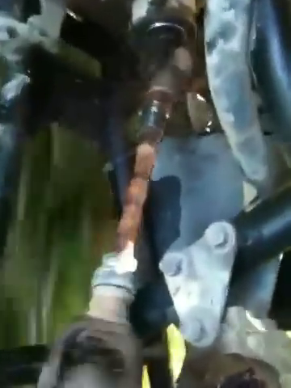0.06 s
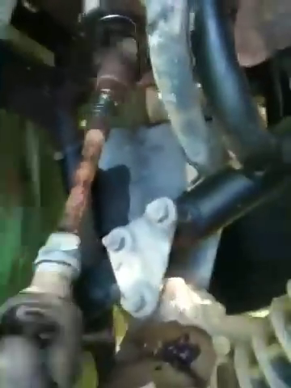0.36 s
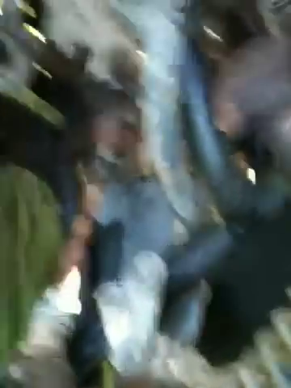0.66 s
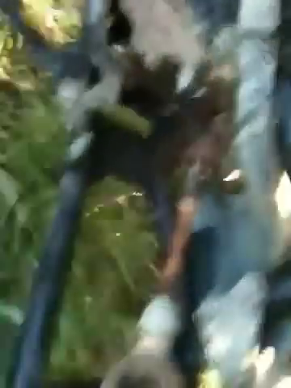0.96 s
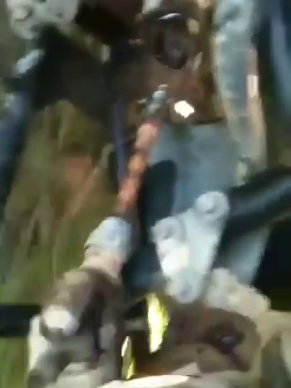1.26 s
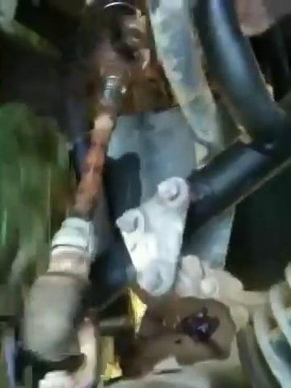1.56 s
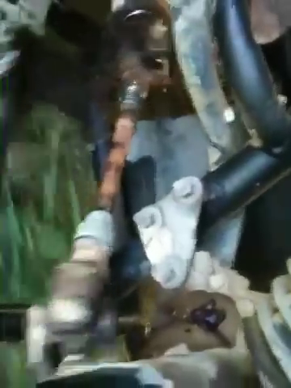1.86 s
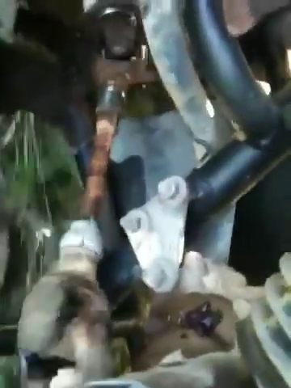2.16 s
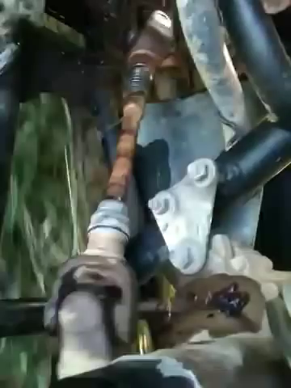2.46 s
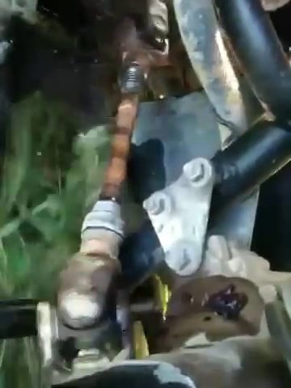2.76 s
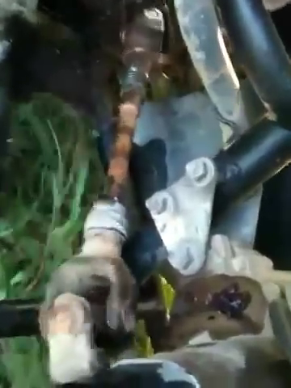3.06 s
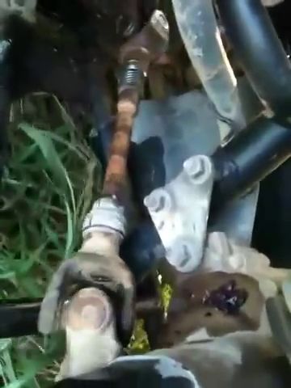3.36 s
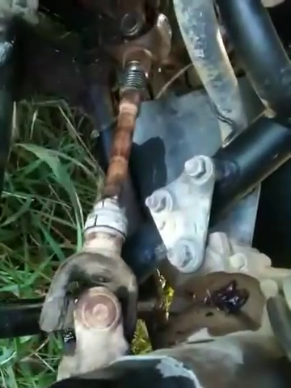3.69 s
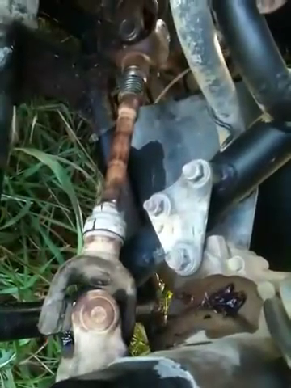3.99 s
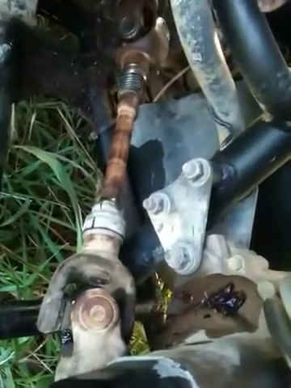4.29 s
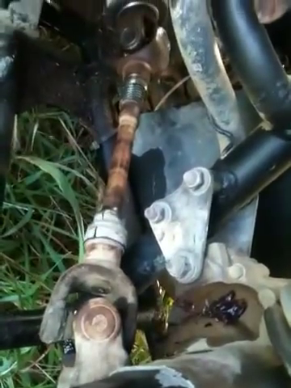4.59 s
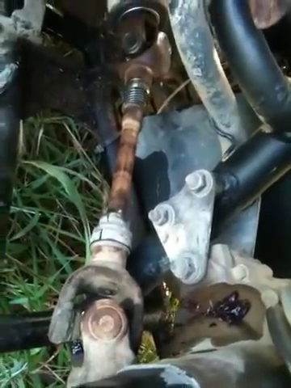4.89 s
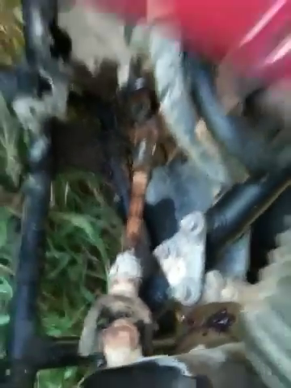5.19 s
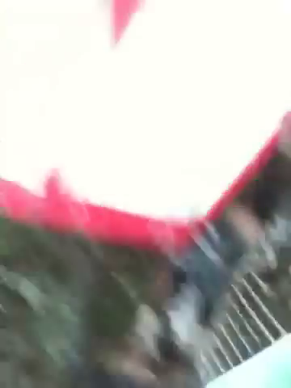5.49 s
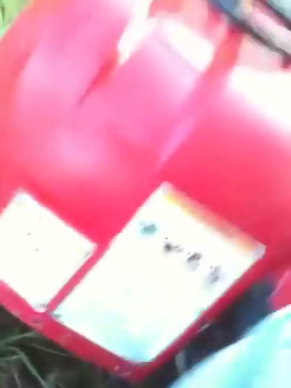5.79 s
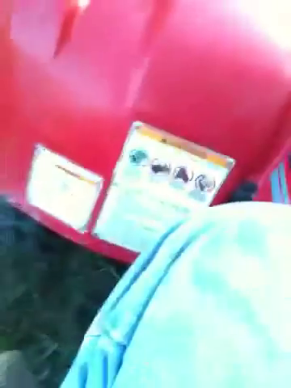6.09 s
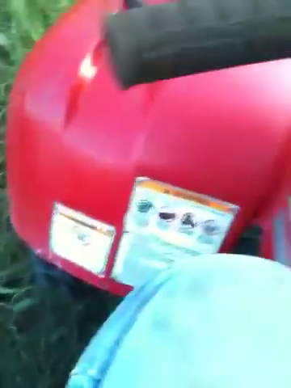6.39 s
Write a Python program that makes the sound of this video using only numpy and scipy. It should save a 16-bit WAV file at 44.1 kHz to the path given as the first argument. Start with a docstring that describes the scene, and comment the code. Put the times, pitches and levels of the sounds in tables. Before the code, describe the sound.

Close to the drive shaft of an all-terrain vehicle rolling over grass, loose metal joints knock and clank in a rapid, irregular clatter, with a brief squeal early on. Tyres rumble and swish underneath. The knocks thin out and stop a little past halfway as the vehicle comes to rest. Grass stems rustle in the quiet open air, then clothing brushes the bodywork and a plastic panel creaks.

```python
"""On grass in the open air, close to the front drive shaft of an all-terrain vehicle.
Slack in the spinning joints knocks and rebounds, ringing the housing; a dry joint sticks and squeals.
Tyres rumble and swish over the turf, and the knocks thin out as the vehicle comes to rest.
Stems rustle and a far insect trills through the lull, then clothing brushes the bodywork
and a panel creaks in a run of slow slips."""
import sys
import numpy as np
from scipy import signal
from scipy.fft import rfft, irfft
from scipy.io import wavfile

SR = 44100
rng = np.random.default_rng(int(sys.argv[2]) if len(sys.argv) > 2 else 0)


def store_pcm(level_fs):
    """Save levels as 16-bit WAV."""
    pcm = np.round(np.clip(level_fs, -1, 1) * 32767).astype(np.int16)
    wavfile.write(sys.argv[1], SR, np.atleast_2d(pcm).T)


N = 283983
TIME_S = np.arange(N) / SR

# Levels are relative within a source. T60 is the time to fall 60 dB.
# Noise spectra. Each row: frequency in Hz, density in dB.
AIR_SPECTRUM = [(24, -54.5), (40, -29), (79, -38.5), (128, -2.5), (224, -3.5), (254, -5.5), (371, -9.5),
                (857, -9.5), (1080, -10), (1220, -11), (2240, -15.5), (5870, -14.5), (6800, -8.5),
                (7560, -15.5), (9030, -18), (17000, -27)]
CLOTH_SPECTRUM = [(50, -52), (100, -21), (180, 0.5), (400, -4), (1000, -8.5), (2200, -12.5), (3400, -9.5),
                  (4600, -9), (6900, -6.5), (8000, -0.5), (9200, -1), (10600, -6.5), (12200, -3.5),
                  (14500, -11.5), (17000, -15.5)]
STEM_SPECTRUM = [(120, -36), (400, -5), (1100, -1.5), (2050, -13), (2450, -5.5), (2800, 3), (3300, -1),
                 (4000, 0), (6800, 1), (11000, -4.5), (17000, -21)]
SCRAPE_SPECTRUM = [(60, -25), (150, -7), (350, 1.5), (600, -3), (1100, -1), (1600, -6.5), (3000, -16),
                   (6000, -31)]
CRUNCH_SPECTRUM = [(150, -36), (450, 2), (1100, 5), (1900, -3.5), (3300, -10.5), (7000, -19)]
RUMBLE_SPECTRUM = [(30, -58), (70, -29.5), (110, -11.5), (170, -3), (280, -1), (480, -3.5), (750, -6.5),
                   (1200, -5.5), (1700, -15.5), (3000, -15.5), (6000, -52)]
SWISH_SPECTRUM = [(900, -22), (1900, 0), (2700, -0.5), (3400, 5), (4000, 2), (5200, 5.5), (7000, 5),
                  (9000, -8.5), (12000, -22.5), (17000, -34.5)]
FIZZ_SPECTRUM = [(5000, -22.5), (8000, 3.5), (10500, 2), (13000, -1.5), (17000, -7.5)]
BODYWORK_SPECTRUM = [(120, -15), (300, -1), (700, -1), (1500, -5.5), (2200, -11), (3500, -14), (8000, -22)]
FRAME_RATTLE_SPECTRUM = [(60, -26.5), (150, -0.5), (300, 12), (600, 17), (900, 5), (1300, 5), (1900, 8.5),
                         (3300, 2), (6000, -4), (10000, 4.5), (17000, -20)]
CRASH_SPECTRUM = [(60, -14.5), (300, 16.5), (900, 16), (1700, 14.5), (3300, 16.5), (8000, 14),
                  (17000, -3.5)]

# Resonances of the vehicle's parts. Each row: frequency in Hz, bandwidth in Hz, level in dB.
THIN_METAL_MODES = [(2613, 32, 1), (2850, 12, 2), (3320, 17.4, -4), (3500, 9.9, -1), (4080, 25, -1),
                    (5260, 27, -3), (7670, 41, -8), (7800, 37, 2)]
CHASSIS_MODES = [(215, 26, -1.5), (266, 16, -1.5), (311, 24, -1), (426.4, 16, -4), (529.5, 18, -2.5),
                 (649, 17, -4.5), (859, 20, -5)]
PANEL_MODES = [(235, 16, -4), (306.5, 26, 4.5), (440, 55, -6), (610, 42, -2.5), (713, 27, 1.5),
               (779, 30, -3), (897, 50, -12), (1076, 45, -3), (1184, 50, -5.5), (1474, 42, -2.5),
               (1660, 38, -7.5), (2044, 60, -9), (2750, 120, -19), (3850, 160, -11)]
JOINT_MODES = [(560, 150, -2), (870, 120, 0), (1250, 140, 1), (2120, 200, -7), (3570, 260, -6),
               (6760, 500, -12)]
HOUSING_MODES = [(276, 26, -2), (413, 61, -4.5), (533, 76, -6), (665, 84, -5.5), (895, 56, -4.5),
                 (1080, 52, -9), (1234, 57, 2), (1342, 30, -3.5), (1958, 75, -6), (2472, 130, -11),
                 (3080, 45, -9.5), (3340, 72, -6.5), (3530, 56, -5.5), (4680, 107, -10.5), (5020, 110, -11),
                 (5600, 60, -18.5), (6500, 200, -12), (7400, 100.5, -32.5), (7900, 140, -35.5),
                 (8730, 120, -29.5)]

# Partials of a snap and of the squeal. Each row: multiple of the pitch, level in dB.
SNAP_PARTIALS = [(0.25, -0.5), (1, -0.5), (1.87, 0), (3.35, -2)]
SQUEAL_OVERTONES = [(2, -2), (4, 4), (5, 2.5), (6, 0), (7, 0.5), (8, -3.5), (9, -6), (10, -7), (11, -2),
                    (12, -11), (13, -7.5)]

# Hum in the air. Each row: frequency in Hz, level in dB.
HUM_TONES = [(105, -81), (211, -76), (316, -79), (997, -88), (1078, -78.5)]
# Sliding cloth. Each row: start in seconds, length in seconds, level in dB.
CLOTH_STROKES = [(5.277, 0.17, -50.5), (5.516, 0.18, -50.5), (5.644, 0.19, -47), (5.741, 0.39, -39),
                 (5.907, 0.092, -37), (6.177, 0.058, -41), (6.267, 0.063, -43.5)]
# A drag through grass. Each row: time in seconds, then scrape, swish and fizz levels in dB.
SCUFF_LEVELS = [(4.93, -71, -65, -79), (4.934, -60.5, -55, -63), (5.024, -50.5, -52, -64.5),
                (5.034, -45, -45.5, -48), (5.084, -51.5, -49, -49), (5.108, -46.5, -42, -42),
                (5.172, -46.5, -52.5, -52), (5.198, -57, -50.5, -58), (5.26, -69.5, -75, -75)]
# Stems springing back. Each row: start in seconds, level in dB, T60 in seconds.
RUSTLES = [(3.483, -28, 0.25), (3.7034, -33, 0.14), (4.052, -32, 0.21), (4.5022, -38, 0.17),
           (4.673, -33.5, 0.22), (4.935, -35, 0.1), (5.032, -34, 0.11)]
# Stem or plastic snapping. Each row: start in seconds, peak in dB, pitch in Hz.
SNAPS = [(0.863, -16, 3260), (1.877, -20, 5000), (6.0302, -13, 2100)]
# Crushed tufts. Each row: start in seconds, length in seconds, level in dB.
CRUNCHES = [(0.681, 0.01, -33), (0.89, 0.008, -34), (1.883, 0.036, -37), (2.045, 0.071, -45),
            (2.41, 0.124, -35.5), (2.767, 0.015, -34)]
# Sharp ticks. Each row: start in seconds, peak in dB, centre in Hz, width in octaves, T60 in seconds.
TICKS = [(0.293, -13, 10900, 1.2, .08), (0.314, -13, 7000, 2.1, 0.091), (.3665, -9, 11100, 1.2, 0.0059),
         (0.742, -16, 9000, 1.2, 0.043), (0.805, -17, 6000, 3, 0.023), (1.0185, -20.5, 9000, 1.2, .022),
         (1.336, -19, 1990, 0.79, 0.019), (1.508, -24, 1600, 1.7, 0.05), (1.688, -21, 1830, 0.32, 0.011),
         (2.574, -16, 3060, 0.9, .014), (3.265, -19.5, 6450, 0.59, 0.035), (3.339, -27.5, 6600, .7, 0.027),
         (3.778, -38, 7000, 1.3, 0.033), (4.118, -44.5, 890, 1.7, 0.025), (4.191, -40.5, 7800, 1.5, 0.024),
         (4.39, -39.5, 6670, 1.1, 0.014), (5.1017, -26, 5670, 0.96, 0.018),
         (5.588, -36.5, 8440, 0.78, .027)]
# Tyres slowing to rest. Each row: time in seconds, then rumble, swish and fizz levels in dB.
ROLL_LEVELS = [(0.0, -31.5, -35.5, -37), (0.33, -31.5, -36, -34.5), (0.7, -31, -38.5, -38.5),
               (0.9, -34.5, -39, -39), (1.0, -35.5, -39.5, -39.5), (1.1, -38.5, -42, -36.5),
               (1.21, -34, -33.5, -43), (1.28, -34.5, -33.5, -39), (1.44, -36.5, -37.5, -39),
               (1.7, -37.5, -37.5, -41.5), (1.94, -36.5, -34, -35), (2.14, -36.5, -36, -40),
               (2.21, -40, -39, -42), (2.5, -36.5, -35, -39), (2.59, -37.5, -35.5, -37),
               (2.71, -44.5, -42.5, -41.5), (2.88, -44, -40.5, -42), (3.14, -47, -42.5, -44.5),
               (3.39, -54.5, -46.5, -49), (3.6, -58, -49, -51), (3.72, -63.5, -55, -62),
               (3.85, -69, -63.5, -66.5)]
# Bodywork slips. Each row: start in seconds, level in dB.
PANEL_SLIPS = [(5.033, -39), (5.147, -47), (5.549, -43.5), (5.727, -31), (5.774, -23), (5.83, -23),
               (5.889, -23.5), (5.937, -26), (5.988, -26), (6.049, -26), (6.107, -26), (6.173, -31),
               (6.331, -41), (6.364, -41), (6.387, -23.5)]
# Chassis jolts. Each row: start in seconds, peak in dB, centre in Hz, T60 in seconds.
BUMPS = [(0.806, -16.5, 645, 0.02), (0.805, -28, 163, 0.077), (1.166, -34, 130, 0.065),
         (2.09, -26, 880, 0.16), (1.653, -28, 605, 0.023), (2.245, -29, 350, 0.066),
         (2.722, -22, 710, 0.28), (2.879, -33, 543, 0.028), (2.937, -19.5, 657, 0.15),
         (3.071, -44, 280, 0.053), (3.489, -40.5, 875, 0.27), (3.885, -49, 485, .1),
         (5.107, -39, 175, 0.17), (5.16, -31.5, 830, 0.045)]
# Jolted brackets and tubes. Each row: start in seconds, level in dB, pitch in Hz, T60 in seconds.
CLANGS = [(0.078, -12.5, 5110, 0.055), (0.077, -25, 880, 0.043), (0.409, -20, 374, 0.12),
          (0.411, -13, 2450, 0.054), (0.409, -12, 1307, 0.053), (0.516, -26, 332.6, 0.057),
          (0.731, -22, 520, 0.035), (0.806, -9, 447, 0.015), (1.507, -22.5, 1690, 0.022),
          (2.24, -33, 505, 0.097), (2.3, -24.5, 160, 0.072), (2.3, -20.5, 1060, 0.015),
          (2.352, -26, 1750, 0.027), (2.878, -38, 600, 0.05), (2.938, -26, 627, 0.063),
          (3.068, -39, 280, 0.084)]
# Dry joint grabbing. Each row: start in seconds, peak in dB.
JOINT_GRABS = [(2.042, -19), (2.058, -23), (2.072, -18), (2.088, -21.5)]
# Dry joint squealing. Each row: start in seconds, length in seconds, top pitch in Hz,
# then levels of the fundamental, third partial and other overtones in dB.
SQUEALS = [(.926, 0.015, 1157, -40, -38.5, -42), (1.0, 0.026, 1159, -46, -43, -43.5),
           (1.026, 0.052, 1163, -45.5, -35, -42.5), (1.081, 0.036, 1186, -27.5, -38, -44.5),
           (1.12, 0.031, 1163, -41.5, -38, -44.5), (1.193, 0.031, 1168, -33, -36.5, -39.5)]
# Driveline knocks. Each row: start in seconds, then thud, ring, clank and clash levels in dB,
# then T60 of the crash in seconds.
KNOCKS = [(0.077, -22, -13.5, -15.5, -20, 0.03), (0.19, -37, -26, -28, -45, 0.089),
          (0.215, -44, -41, -35, -49, 0.046), (0.255, -41.5, -39.5, -26, -25, 0.15),
          (0.292, -53, -28, -19.5, -22, 0.11), (0.368, -32, -27.5, -36, -39, 0.042),
          (0.408, -23.5, -18.5, -17.5, -25, 0.066), (0.515, -29, -15.5, -22.5, -30.5, 0.05),
          (0.631, -35, -34, -39, -50, 0.039), (0.731, -20, -20.5, -20, -30, 0.033),
          (0.749, -39, -27.5, -25, -34, 0.14), (0.777, -35, -29, -22, -23.5, 0.046),
          (0.871, -31, -28, -33, -41, 0.066), (1.166, -30, -17, -21.5, -33, 0.033),
          (1.337, -39, -26, -33.5, -47, 0.19), (1.653, -31, -46, -38, -39, 0.02),
          (1.689, -37.5, -34.5, -36, -52, 0.13), (1.804, -34.5, -35, -38, -34.5, 0.03),
          (1.878, -35, -36.5, -41.5, -28, 0.027), (2.299, -32, -37, -51, -49, 0.022),
          (2.315, -45, -35, -34.5, -49, 0.036), (2.352, -43, -37, -39.5, -48, 0.06),
          (2.379, -31, -29, -32, -41, 0.19), (2.574, -31, -27.5, -30, -35, 0.11),
          (2.72, -29, -27, -27.5, -29, 0.22), (2.937, -28, -29, -28, -32.5, 0.1),
          (2.973, -38, -33.5, -36, -36, 0.17), (3.361, -44, -39, -47, -54, 0.19)]
# Thud, ring, clank and clash bands. Each row: low edge in Hz, high edge in Hz.
KNOCK_BANDS = [(150, 800), (800, 1600), (1600, 4200), (4200, 17000)]


def amp(db):
    """Decibels to gain."""
    return 10 ** (np.asarray(db) / 20)


def unit_rms(x):
    """Scales to an rms of one."""
    return x / np.sqrt(np.mean(x ** 2) + 1e-20)


def unit_peak(x):
    """Scales to a peak of one."""
    return x / (abs(x).max() + 1e-12)


def unit_onset(x):
    """Scales the first 15 ms to an rms of one."""
    return x / np.sqrt(np.mean(x[:SR * 15 // 1000] ** 2) + 1e-20)


def add(mix, start_s, sound):
    """Mixes a sound in at start_s."""
    part = mix[max(round(start_s * SR), 0):][:len(sound)]
    part += sound[:len(part)]


def colour(x, spectrum):
    """Filters by a spectrum, interpolated over log frequency."""
    hz, db = np.transpose(spectrum)
    bins_hz = np.fft.rfftfreq(len(x), 1 / SR)
    return irfft(rfft(x) * amp(np.interp(np.log(bins_hz + 1), np.log(hz), db)), len(x))


def band(x, lo_hz, hi_hz, order=2):
    """Causal band-pass."""
    edges_hz = np.clip([lo_hz, hi_hz], 10, SR / 2 - 100)
    return signal.sosfilt(signal.butter(order, edges_hz, "band", fs=SR, output="sos"), x)


def drift(rate_hz):
    """Random wander of unit rms."""
    knots = rng.standard_normal(8192)
    return unit_rms(np.interp(TIME_S * rate_hz, np.arange(len(knots)), knots))


def grains(per_s, spread_db):
    """Random train of tiny impacts, a few of them large."""
    sizes = amp(spread_db * np.minimum(rng.exponential(1, N), 4)) * rng.choice([-1, 1], N)
    return unit_rms(sizes * (rng.random(N) < per_s / SR))


def grit(spectrum, per_s, spread_db):
    """Coloured grains of unit rms."""
    return unit_rms(colour(grains(per_s, spread_db), spectrum))


def ringing(modes, t):
    """Impulse response of damped modes, each slightly off in pitch and level."""
    hz, width_hz, db = np.transpose(modes)[:, :, None]
    detune, uneven_db, phase = rng.standard_normal((3, len(modes), 1))
    swing = np.sin(2 * np.pi * (hz * (1 + 0.0047 * detune) * t + phase))
    envelope = (1 - np.exp(-t * hz * 2)) * np.exp(-np.pi * width_hz * t)
    return (amp(db + uneven_db) * width_hz * envelope * swing).sum(0)


def resonate(force, modes, t):
    """Drives modes with a force; t spans their impulse response."""
    return signal.fftconvolve(force, ringing(modes, t))[:len(force)]


def burst(t, rise_s, hold_s, t60_s):
    """Noise that rises, holds and decays."""
    decay = amp(-60 * np.maximum(t - hold_s, 0) / max(t60_s, .002))
    return rng.standard_normal(len(t)) * np.minimum(t / rise_s, 1) * decay


def swell(start_s, length_s, rise_s, t60_s):
    """Gain that rises, holds and decays."""
    age_s = TIME_S - start_s
    return np.clip(age_s / rise_s, 0, 1) * amp(-60 * np.maximum(age_s - length_s, 0) / t60_s)


def follow_levels(layers, levels, t60_s):
    """Sums layers, each on its own level column; all decay after the last row."""
    times_s, *curves_db = np.transpose(levels)
    gate = (TIME_S >= times_s[0]) * amp(-60 * np.maximum(TIME_S - times_s[-1], 0) / t60_s)
    return gate * sum(layer * amp(np.interp(TIME_S, times_s, db)) for layer, db in zip(layers, curves_db))


def air(noise_db=-61.5, waver=0.0044):
    """Quiet outdoor noise with a faint wavering hum."""
    hum = np.zeros(N)
    for hz, db in HUM_TONES:
        cycles = np.cumsum(hz * (1 + waver * drift(23))) / SR
        hum += amp(db) * unit_rms(np.sin(2 * np.pi * cycles))
    return amp(noise_db) * unit_rms(colour(rng.standard_normal(N), AIR_SPECTRUM)) + hum


def insect(centre_hz=7600, width_hz=420, pulses_per_s=26, level_db=-69.5):
    """A far insect rasps in quick, slightly uneven pulses."""
    rasp = band(rng.standard_normal(N), centre_hz - width_hz / 2, centre_hz + width_hz / 2)
    cycles = np.cumsum(pulses_per_s * (1 + .15 * drift(8))) / SR
    return amp(level_db) * unit_rms(rasp * (1 + .5 * np.sin(2 * np.pi * cycles)))


def cloth(gain_db=-1):
    """Threads catch and slide in a fine hiss, stroke after stroke."""
    catches = amp(1.2 * drift(70))
    power = sum((amp(db) * swell(start_s, length_s, rise_s=0.036, t60_s=0.28)) ** 2
                for start_s, length_s, db in CLOTH_STROKES)
    return amp(gain_db) * grit(CLOTH_SPECTRUM, per_s=12000, spread_db=2) * catches * np.sqrt(power)


def grass_scuff(gain_db=-1):
    """Something drags through the grass in one gritty stroke."""
    layers = [grit(spectrum, per_s=7000, spread_db=3.2)
              for spectrum in (SCRAPE_SPECTRUM, SWISH_SPECTRUM, FIZZ_SPECTRUM)]
    return amp(gain_db) * follow_levels(layers, SCUFF_LEVELS, t60_s=.1)


def stem_rustles(brush_db=-4.5, metal_db=-9.5):
    """A bent stem lets go, brushes its neighbours and flicks thin metal."""
    out, t = np.zeros(N), np.arange(SR // 4) / SR
    for start_s, db, t60_s in RUSTLES:
        brush = unit_peak(colour(burst(t, 0.0015, 0.004, t60_s), STEM_SPECTRUM))
        metal = unit_peak(resonate(burst(t, .002, .004, .04), THIN_METAL_MODES, t))
        add(out, start_s, amp(db + brush_db) * brush + amp(db + metal_db) * metal)
    return out


def snaps(width_ratio=0.24, rise_s=.001):
    """Stiff stem or plastic gives way in a few heavily damped cycles."""
    out, t = np.zeros(N), np.arange(SR // 50) / SR
    for start_s, db, hz in SNAPS:
        modes = [(k * hz, width_ratio * hz, mode_db) for k, mode_db in SNAP_PARTIALS]
        ring = ringing(modes, t) * (1 - np.exp(-t / rise_s))
        add(out, start_s, amp(db) * unit_peak(band(ring, 250, 16000)))
    return out


def tuft_crunches():
    """Dry tufts break under the tread in short clumps."""
    clumps = sum(amp(db) * swell(start_s, length_s, rise_s=0.0036, t60_s=0.084)
                 for start_s, length_s, db in CRUNCHES)
    return grit(CRUNCH_SPECTRUM, per_s=1200, spread_db=4.5) * clumps


def ticks():
    """Grit, stems and loose metal tick with a short ring."""
    out, t = np.zeros(N), np.arange(SR // 12) / SR
    for start_s, db, hz, octaves, t60_s in TICKS:
        edge_ratio = 2 ** (octaves / 2)
        tick = band(burst(t, 0.00056, 0.0031, t60_s), hz / edge_ratio, hz * edge_ratio)
        add(out, start_s, amp(db) * unit_peak(tick))
    return out


def tyres(patchy_db=1.44, boom_db=-4, swish_db=-1):
    """Turf shakes tyres and chassis; grass blades brush and crackle underneath."""
    lumps = amp(1.1 * drift(35))
    shaking = grains(per_s=300, spread_db=2.5)
    boom = unit_rms(resonate(shaking, CHASSIS_MODES, np.arange(SR // 3) / SR))
    tread = grit(RUMBLE_SPECTRUM, per_s=1800, spread_db=2.6)
    rumble = unit_rms(tread + amp(boom_db) * boom) * lumps
    tufts = amp(patchy_db * drift(60))
    swish = amp(swish_db) * grit(SWISH_SPECTRUM, per_s=6000, spread_db=3) * tufts
    fizz = grit(FIZZ_SPECTRUM, per_s=9000, spread_db=2.9) * tufts
    return follow_levels([rumble, swish, fizz], ROLL_LEVELS, t60_s=0.99)


def housing_taps(per_s=30, re_rumble_db=-13.5):
    """Loose parts tap the housing at random while the wheels turn."""
    times_s, rumble_db = np.transpose(ROLL_LEVELS)[:2]
    ring = ringing(HOUSING_MODES, np.arange(SR // 12) / SR)
    tapping = signal.fftconvolve(grains(per_s, spread_db=-0.5), ring)[:N]
    gain = amp(re_rumble_db + np.interp(TIME_S, times_s, rumble_db)) * (TIME_S < times_s[-1])
    return gain * unit_rms(band(tapping, 200, 4500))


def panel_creak(gain_db=-11, scuff_db=-9, dense_db=-5, rise_s=0.0035, bend=.025):
    """Each slip sends a hollow knock through the panel, whose pitch shifts as it bends."""
    out, t = np.zeros(N), np.arange(SR // 6) / SR
    dense_modes = unit_onset(colour(burst(t, .003, .009, .07), BODYWORK_SPECTRUM))
    loudest_db = max(db for _, db in PANEL_SLIPS)
    for start_s, db in PANEL_SLIPS:
        bent_modes = [(hz * (1 + bend * rng.standard_normal()), width_hz, mode_db)
                      for hz, width_hz, mode_db in PANEL_MODES]
        hollow = unit_onset(ringing(bent_modes, t) * (1 - np.exp(-t / rise_s)))
        knock = unit_onset(band(hollow + amp(dense_db) * dense_modes, 140, 12000))
        top_hz = 3600 * amp((db - loudest_db) / 2)  # harder slips scuff brighter
        scuff = unit_onset(band(burst(t, .002, .011, .1), 500, top_hz))
        add(out, start_s - .002, amp(db + gain_db) * (knock + amp(scuff_db) * scuff))
    return out


def chassis_bumps():
    """The chassis jolts over the ground; its panels boom briefly."""
    out, t = np.zeros(N), np.arange(SR // 5) / SR
    for start_s, db, hz, t60_s in BUMPS:
        boom = band(burst(t, 0.0012, 0.0038, t60_s), hz / 1.38, hz * 1.4)
        add(out, start_s - .001, amp(db) * unit_peak(boom))
    return out


def bracket_clangs():
    """A jolted bracket or tube rings at its own pitch."""
    out, t = np.zeros(N), np.arange(SR // 5) / SR
    for start_s, db, hz, t60_s in CLANGS:
        envelope = amp(db - 60 * t / t60_s) * (1 - np.exp(-t * hz * 2))
        add(out, start_s, envelope * np.sin(2 * np.pi * hz * t))
    return out


def joint_judder():
    """The dry joint grabs without settling on a pitch: a short, rough scrape."""
    out, t = np.zeros(N), np.arange(SR // 12) / SR
    for start_s, db in JOINT_GRABS:
        rub = burst(t, .002, .008, .04)
        add(out, start_s, amp(db) * unit_peak(resonate(rub, JOINT_MODES, t)))
    return out


def joint_squeal(gain_db=3, rise_s=0.0058, fade_s=0.1, sag=0.006):
    """Stick-slip at a shaky, arching pitch; the grip keeps breaking and each overtone wavers."""
    shake = 1 + .0035 * drift(60) + .002 * drift(250) + .003 * drift(2300)
    grip = 1 + .2 * drift(700) + .16 * drift(130)
    overtones = [(k, amp(db - 1 + 4.5 * drift(45)), rng.random()) for k, db in SQUEAL_OVERTONES]
    out = np.zeros(N)
    for start_s, length_s, top_hz, first_db, third_db, others_db in SQUEALS:
        on = (TIME_S >= start_s) & (TIME_S < start_s + length_s + fade_s)
        arch = np.sin(np.pi * np.minimum((TIME_S[on] - start_s) / length_s, 1.5))
        cycles = np.cumsum(top_hz * (1 - sag * (1 - arch)) * shake[on]) / SR
        tone = amp(first_db) * np.sin(2 * np.pi * cycles) + amp(third_db) * np.sin(2 * np.pi * 3 * cycles)
        others = sum(gain[on] * np.sin(2 * np.pi * (k * cycles + phase)) for k, gain, phase in overtones)
        envelope = amp(gain_db) * grip * swell(start_s, length_s, rise_s, fade_s)
        out[on] += envelope[on] * (tone + amp(others_db) * others)
    return out


def rebounds(blows, hard_db=-21, delay_s=0.014, gain_db=-13, t60_ratio=3.2):
    """A hard blow throws the joint back across its slack; it lands again, weaker and looser."""
    return [(start_s + delay_s, bands_db + gain_db, t60_s * t60_ratio)
            for start_s, bands_db, t60_s in blows if bands_db[1] > hard_db]


def driveline_knocks(chatter=0.088, crash_db=-8, rattle_db=-17, shove_db=-20, shove_hz=55):
    """Metal faces meet and chatter; the housing rings and loose parts rattle on the frame."""
    out, t = np.zeros(N), np.arange(SR // 6) / SR
    blows = [(start_s, np.array(bands_db), t60_s) for start_s, *bands_db, t60_s in KNOCKS]
    shove = np.sin(2 * np.pi * shove_hz * t) * np.exp(-t / .007)  # the whole frame moves with the thud
    for start_s, bands_db, t60_s in blows + rebounds(blows):
        contact = chatter * burst(t, 0.00046, 0.0053, t60_s / 4)
        contact[0] += 1  # first impact
        ring = unit_onset(resonate(contact, HOUSING_MODES, t))
        crash = colour(burst(t, 0.00054, 0.0048, t60_s), CRASH_SPECTRUM)
        rattle = colour(burst(t, 0.035, 0.035, 3 * t60_s), FRAME_RATTLE_SPECTRUM)
        hit = ring + amp(crash_db) * crash + amp(rattle_db) * rattle
        knock = sum(amp(db) * unit_onset(band(hit, lo_hz, hi_hz, order=3))
                    for db, (lo_hz, hi_hz) in zip(bands_db, KNOCK_BANDS))
        add(out, start_s - .0005, knock + amp(bands_db[0] + shove_db) * shove)
    return out


def scene():
    """All sources in the open air, mono."""
    vehicle = driveline_knocks() + bracket_clangs() + chassis_bumps() + housing_taps() + tyres()
    vehicle += joint_squeal() + joint_judder() + ticks() + panel_creak()
    grass = tuft_crunches() + snaps() + stem_rustles() + grass_scuff()
    return (vehicle + grass + cloth() + air() + insect())[None]


def record(dry):
    """Soft overload on the loudest knocks, then a low-pass."""
    ceiling, cutoff_hz = .85, 17400
    soft = ceiling * np.tanh(dry / ceiling)
    low_pass = signal.firwin(511, cutoff_hz, window=("kaiser", 9), fs=SR)
    return signal.oaconvolve(soft, low_pass[None], "same", axes=1)


dry = scene()
out = record(dry)
store_pcm(out)
```